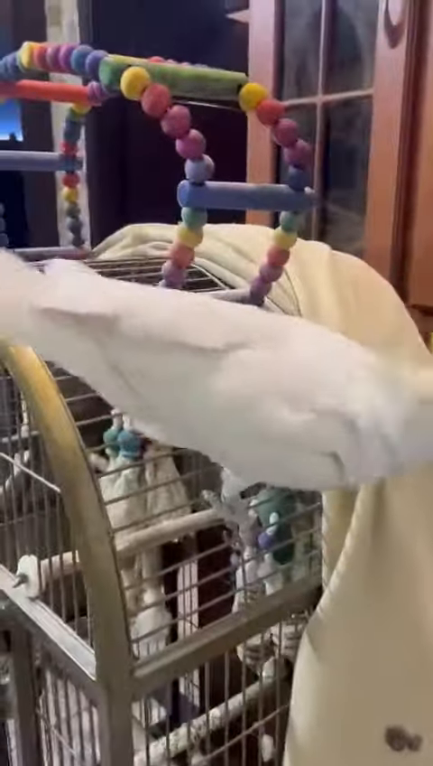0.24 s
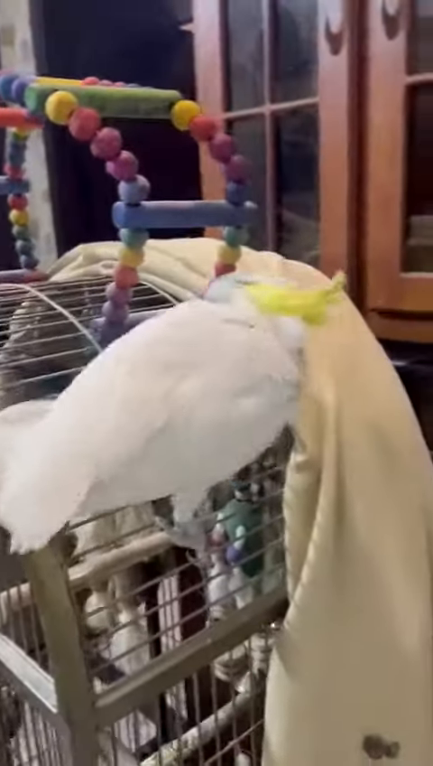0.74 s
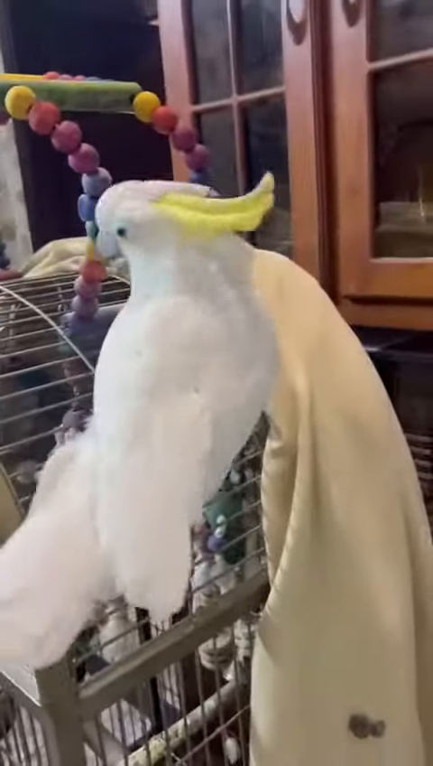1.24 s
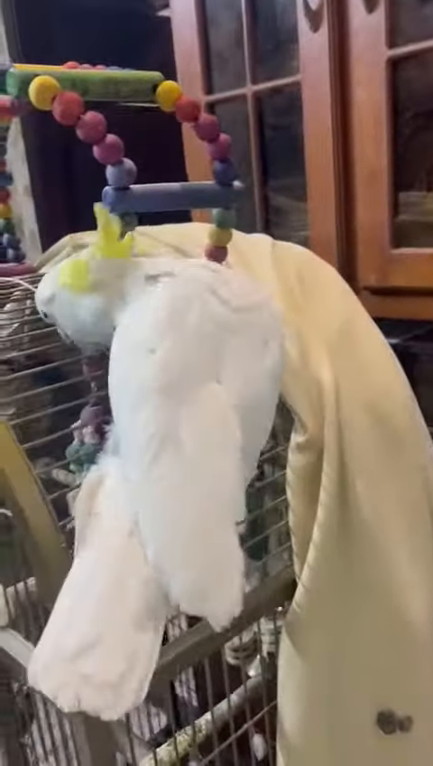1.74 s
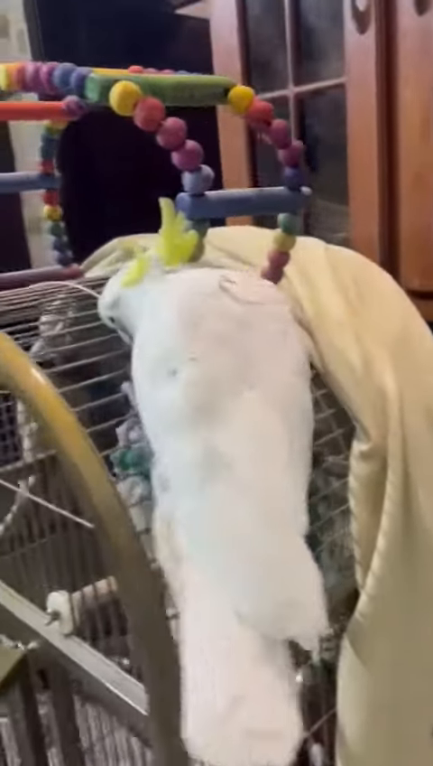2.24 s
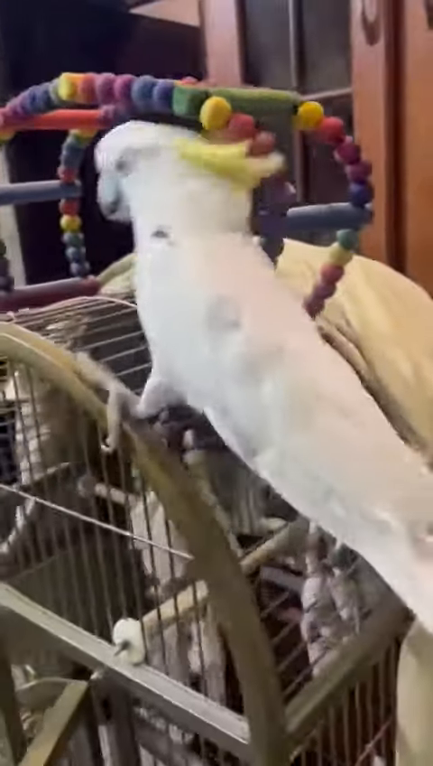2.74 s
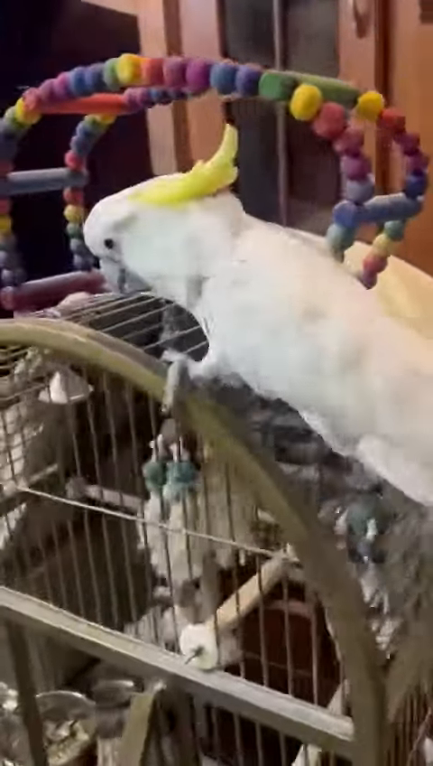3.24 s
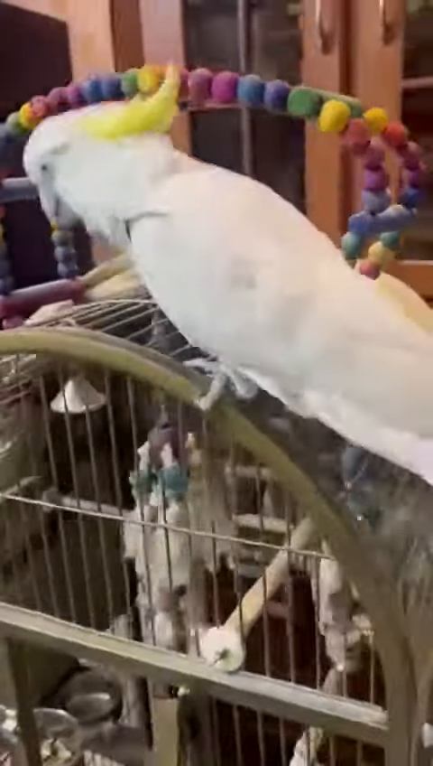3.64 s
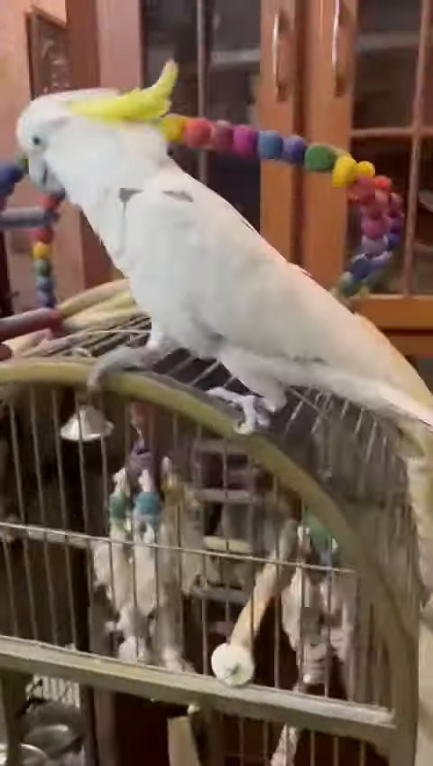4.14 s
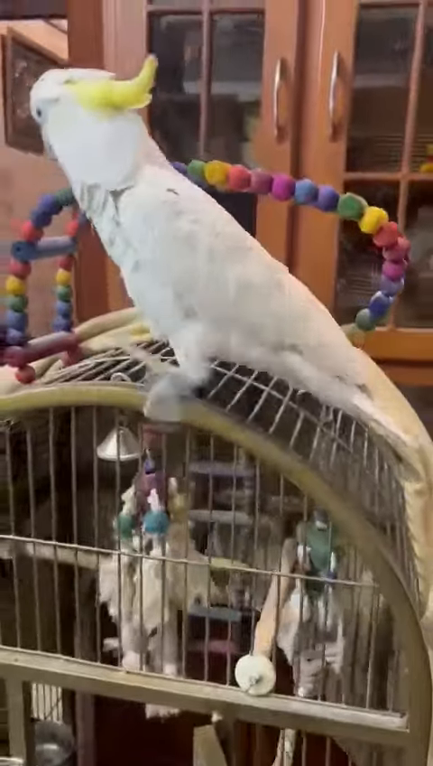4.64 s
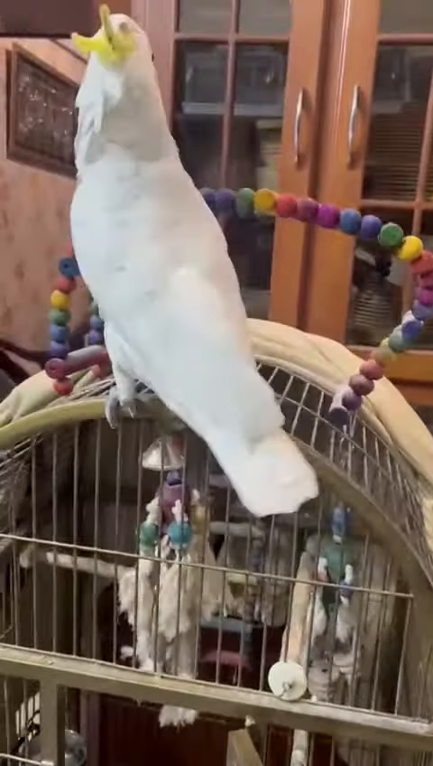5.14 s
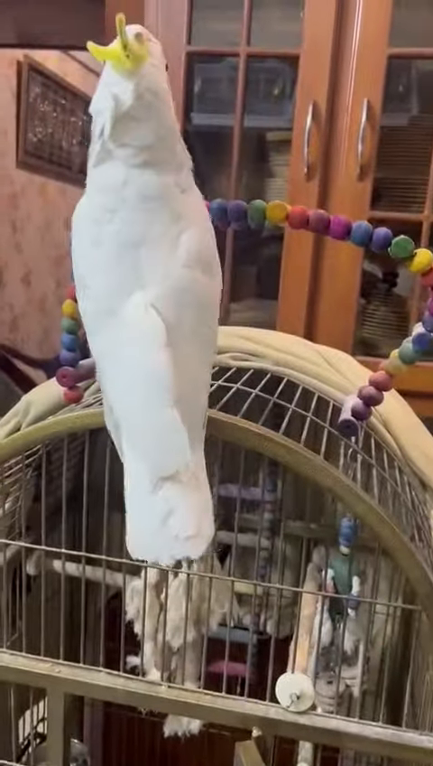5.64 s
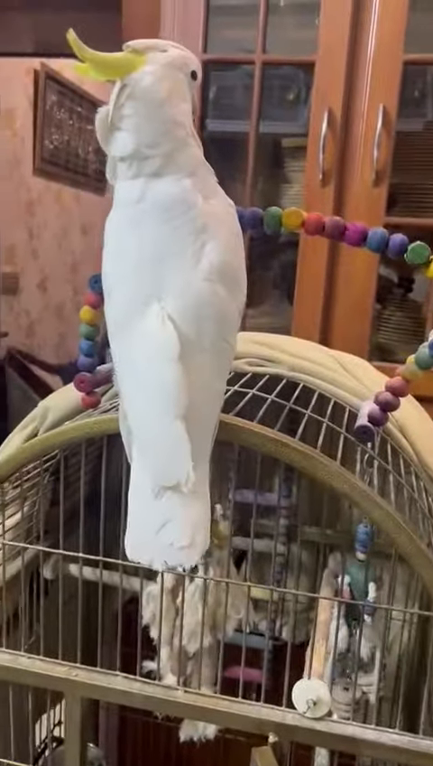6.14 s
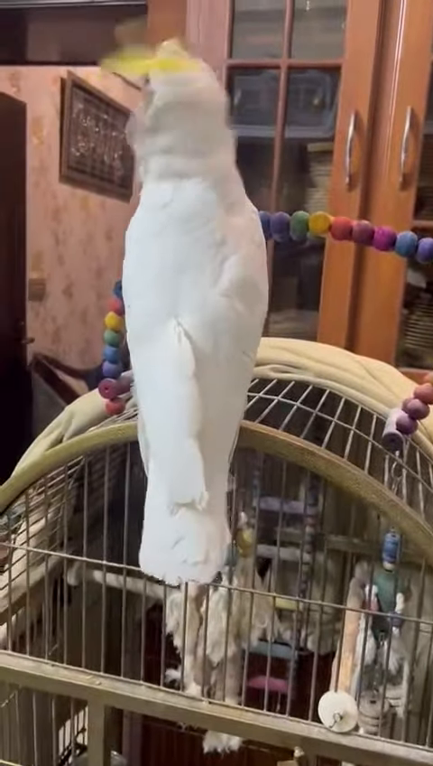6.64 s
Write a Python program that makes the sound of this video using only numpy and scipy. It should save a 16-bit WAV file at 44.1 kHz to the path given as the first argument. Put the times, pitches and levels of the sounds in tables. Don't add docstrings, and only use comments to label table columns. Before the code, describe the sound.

A pet cockatoo gives two small rising chirps, a short squawk, rattles its wire cage, then screams four harsh piercing squawks in a furnished room.

```python
import sys
import numpy as np
from scipy import signal
from scipy.io import wavfile
from scipy.ndimage import uniform_filter1d

SR = 44100
rng = np.random.default_rng(int(sys.argv[2]) if len(sys.argv) > 2 else 0)


def volts_from_db(level):
    exponent = np.asarray(level, float) / 20
    return 10 ** exponent


def store_wav(level_fs):
    pcm = np.round(np.clip(np.atleast_2d(level_fs), -1, 1) * 32767)
    wavfile.write(sys.argv[1], SR, pcm.T.astype(np.int16))


N = 303849


def rms_one(x):
    return x / np.sqrt(np.mean(x ** 2) + 1e-20)


def at_hz(points, hz):
    table = np.array(points)
    return np.interp(np.log(hz), np.log(table[:, 0]), table[:, 1])


def drift(rate_hz, size):
    r = np.exp(-2 * np.pi * rate_hz / SR)
    noise = rng.standard_normal(size + 4000)
    return rms_one(signal.lfilter([1], [1, -2 * r, r * r], noise)[4000:])


def ring(clicks, hz, t60):
    r, w = volts_from_db(-60 / (t60 * SR)), 2 * np.pi * hz / SR
    return signal.lfilter([0, np.sin(w)], [1, -2 * r * np.cos(w), r * r], clicks + 1e-18)


def bands():
    edges = 24 * 2 ** np.arange(0, 9.1, .5)
    return [(np.sqrt(a * b), signal.butter(2, [a, b], "band", fs=SR, output="sos"))
            for a, b in zip(edges, edges[1:])]


def add(out, s, part):
    i = round(s * SR)
    out[i:i + len(part)] += part[:len(out) - i]


# flutter_hz, flutter_depth (0-1), pitch_jitter (share), upper_partials_db,
# half_line_slope_db (per multiple of pitch)
EFFORT = [
    (60.1, 0.2, 0.0013, -6, -8),
    (75.6, 0.53, 0.0012, -2.5, -4.5),
    (61.3, 0.81, 0.0073, -4, -3),
    (106.3, 0.8, 0.0055, -4.5, 0.9),
    (110.3, 0.5, 0.00545, 0.5, 1.3),
    (104.6, 0.9, 0.0057, -4.5, 0.7),
    (97.3, 0.39, 0.0076, 2, 0.1),
    (80.8, 0.55, 0.003, 5, -6),
]
# pitch_multiple, over_partial_3_db
UPPER = [(4, -7), (5, -23.5)]
# pitch_multiple, over_half_lines_db
HALVES = [(.5, -21.5), (1.5, 2.5), (2.5, -1), (3.5, 1), (4.5, -2.5), (5.5, -5.5)]


def voice():
    out, t = np.zeros(N), np.arange(SR // 4) / SR
    calls = [chirp(t, *c) for c in zip(CHIRPS, CHIRP_BEND)]
    calls += [squawk(t, *c) for c in zip(SQUAWKS, SQUAWK_TONE, SQUAWK_BREATH)]
    for call, (flutter_hz, depth, jitter, upper_db, slope_db) in zip(calls, EFFORT):
        s, length, pitch, first, second, third, half = call
        flutter = np.cos(np.cumsum(2 * np.pi * flutter_hz * (1 + 0.15 * drift(12, len(t))) / SR))
        unrest = 1 + depth * np.abs(np.gradient(pitch)) * SR / 4000
        waver = jitter * unrest * drift(120, len(t)) + .022 * depth * flutter
        phase = np.cumsum(2 * np.pi * pitch * (1 + waver) / SR)

        lines = [(1, first), (2, second), (3, third)]
        lines += [(k, third + db + upper_db) for k, db in UPPER]
        lines += [(k, half + db + slope_db * (k - 1.5)) for k, db in HALVES]
        sound = 0
        for k, db in lines:
            wander_db = (.8 + 2.5 * depth) * min(1.5, k / 3) * drift(35, len(t))
            sound = sound + volts_from_db(db + wander_db) * np.sin(k * phase)
        sound = sound * (1 + .35 * np.clip(depth, 0, 1) * flutter)

        air = throat(rng.standard_normal(len(t)) * (1 + np.cos(phase)))
        rasp = signal.sosfilt(signal.butter(4, 3300, "high", fs=SR, output="sos"), air)
        sound = sound + volts_from_db(second - 27) * rms_one(air) + volts_from_db(half - 8 + slope_db) * rms_one(rasp)
        fade = np.clip(np.minimum(t, length - t) / .005, 0, 1)
        add(out, s, sound * fade)
    return out


# start_s, length_s, from_hz, to_hz, level_db
CHIRPS = [
    (0.386, 0.092, 1863, 2370, -33.5),
    (0.622, .097, 1671, 2410, -26.5),
]
CHIRP_BEND = [2.2, 1.15]
# start_over_level_db, gain_to_break_db
CHIRP_PARTIALS = [(-24, 12), (-43, 27.5)]


def chirp(t, row, bend):
    dip_db, break_at, mute_db, half_db = -4, 0.72, -36, -21
    s, length, from_hz, to_hz, level_db = row
    part = np.clip(t / length, 0, 1)
    broken = np.clip((part - break_at) / (1 - break_at), 0, 1)
    first = level_db + dip_db * np.sin(np.pi * part)
    second, third = [level_db + db + gain_db * part + (mute_db - gain_db) * broken
                     for db, gain_db in CHIRP_PARTIALS]
    half = level_db + half_db - 40 * np.clip(1 - 2 * broken, 0, 1)
    pitch = from_hz + (to_hz - from_hz) * part ** bend
    return s, length, pitch, first, second, third, half


# start_s, length_s, pitch_hz, sag_hz_per_s, level_db
SQUAWKS = [
    (1.481, 0.24, 2064, 702.5, -24.5),
    (3.83, 0.23, 2174, 201.5, -11),
    (4.164, 0.2, 2176, 400, -10.5),
    (4.532, 0.19, 2108, 279.5, -14),
    (4.995, 0.18, 2060, -9, -18),
    (6.704, 0.18, 1940, -200, -40),
]
# scoop_hz (from below), attack_s, then over level partial_1_db, partial_3_db, half_lines_db
SQUAWK_TONE = [(401, .03, -4.5, -10, -41.5), (114, 0.009, -5.5, -3.5, -18),
               (-42.5, 0.022, -14.5, -8.5, -16.5), (161, .018, -11, -2.5, -16),
               (113, .014, -13.5, -3.5, -13.5), (339.5, 0.059, -7, -19, -52)]
# start_db (over level), fade_db_per_s, scoop_bend (under 1 jumps late, over 1 early)
SQUAWK_BREATH = [(-16, -6.5, .6), (-3.5, 33.5, 1.3), (-5.5, 23, 0.97), (-8.5, 11.5, 0.98),
                 (0.5, 12.5, 1.03), (-14.5, -115, 2.2)]
FADE_DB_PER_S = [34, 51, 11.5, 1.5]
RELEASE_DB = [-9.5, -1.5, -8.5, -21.5]


def squawk(t, row, tone, breath):
    release_s, release_drop_hz, doubling_s, doubling_rise_s = 0.027, 162.8, .034, .006
    s, length, hz, sag, level_db = row
    scoop, attack, first_db, third_db, half_db = tone
    start_db, fade, bend = breath
    opening = np.clip(1 - t / attack, 0, 1)
    closing = np.clip(1 - (length - t) / release_s, 0, 1)
    pitch = hz - scoop * opening ** bend - sag * t - release_drop_hz * closing
    level = level_db + start_db * opening ** .4 - fade * t
    late = -40 / (1 + np.exp((t - doubling_s) / doubling_rise_s))
    partials_db = (first_db, 0, third_db, half_db + late)
    lines = [level + db - more * t + last_db * closing
             for db, more, last_db in zip(partials_db, FADE_DB_PER_S, RELEASE_DB)]
    return s, length, pitch, *lines


# centre_hz, width_hz, level_db
THROAT = [(900, 200, -28), (1700, 1100, -2.5), (2705, 1100, 1), (4010, 280, 5), (6220, 540, 3.5),
          (8330, 290, -1.5), (9600, 600, -3.5)]


def throat(x):
    out = 0
    for k, (hz, width, db) in enumerate(THROAT):
        out = out + (-1) ** k * volts_from_db(db) * np.sqrt(width) * ring(x, hz, 1.8 / width)
    return out


# start_s, count, gap_s
CREAKS = [
    (3.778, 5, .0122),
    (4.143, 3, .0097),
    (4.505, 4, .0102),
    (4.952, 5, .0115),
]
CREAK_FULL_DB = [-14.5, -17, -16.5, -24.5]


def creaks():
    start_db, growth = -16.5, 0.19
    out, t = np.zeros(N), np.arange(600) / SR
    for (s, count, gap), full_db in zip(CREAKS, CREAK_FULL_DB):
        for k in range(count):
            puff = throat(rng.standard_normal(len(t)) * t * np.exp(-t / .002))
            level = volts_from_db(full_db + 6 + start_db * growth ** k)
            add(out, s + k * gap, level * puff / np.abs(puff).max())
    return out


def snap():
    out, t = np.zeros(N), np.arange(600) / SR
    phase = 2 * np.pi * 750 * (t + 3.07 * 0.00034 * (1 - np.exp(-t / 0.00014)))
    add(out, 1.0765, volts_from_db(-23.5) * np.sin(phase) * np.exp(-t / 0.0013))
    return out


def cage():
    modes = np.geomspace(500, 12000, 300) * (1 + .01 * rng.standard_normal(300))
    return knocks(modes) + scuffs(modes) + rings()


# start_s, peak_db, thick_bars_db, loudest_bar_hz, rattle_s
KNOCKS = [(1.789, -23.5, -24, 6470, 0.015), (1.895, -29, -16.5, 9400, 0.014),
          (2.008, -33, -25, 7660, 0.021), (2.135, -14.5, -22, 6540, 0.024),
          (2.159, -22.5, -14.5, 6860, 0.036), (2.269, -20.5, -5.5, 8600, 0.0062),
          (2.499, -44, -27, 7320, 0.0087), (2.527, -28.5, -20.5, 4670, 0.036),
          (2.58, -30.5, -1.5, 4300, 0.0084), (2.671, -15.5, -24.5, 8510, 0.009),
          (2.965, -42, -31, 8050, 0.012), (3.15, -38.5, -13, 8400, 0.035),
          (3.218, -32, -12.5, 8950, 0.0057), (3.417, -37.5, -26.5, 9080, 0.032),
          (3.463, -34, -16, 9200, 0.0098), (3.568, -29, -10, 7910, 0.014), (5.489, -66.5, 11, 4960, 0.01),
          (5.724, -56, -3.5, 7860, 0.017), (5.804, -72, 18.5, 4590, 0.0099),
          (5.899, -57.5, -3, 7960, 0.0087), (6.109, -54.5, -33, 5670, 0.012), (6.166, -68, 10, 5060, 0.011)]
BAR_ZONES_HZ = [1100, 3435, 8600]


def knocks(modes):
    out, t = np.zeros(N), np.arange(SR // 2) / SR
    for s, peak_db, weight_db, hz, rattle in KNOCKS:
        hits = rng.random(len(t)) < 4000 / SR
        clicks = hits * rng.standard_normal(len(t)) * np.exp(-t / max(rattle, .001)) * 0.91
        clicks[0] = .45
        zones_db = [weight_db - 16.5, weight_db, -4]
        colour = np.interp(np.log(modes), np.log(BAR_ZONES_HZ), zones_db)
        colour = colour + 9 * np.exp(-(np.log(modes / hz) / .07) ** 2)
        add(out, s, volts_from_db(peak_db - 4.5) * bars(clicks, colour, modes))
    return out


# start_s, level_db, centre_hz, spread_octaves, swell_s
SCUFFS = [
    (0, -57, 4500, 1.5, 0.0086),
    (0.161, -54.5, 2300, 1.26, 0.093),
    (0.244, -42.5, 1576, 1.18, 0.026),
    (1.078, -56.5, 8000, 0.91, 0.019),
    (1.159, -53, 3060, 0.7, 0.07),
    (1.637, -42, 2500, 1.06, 0.027),
    (1.989, -51, 7900, 2.8, 0.013),
    (3.189, -43, 7400, 2.2, 0.028),
    (3.595, -37.5, 3760, .5, 0.05),
    (6.58, -65, 7000, 1.03, 0.076),
]


def scuffs(modes):
    out, t = np.zeros(N), np.arange(SR // 2) / SR
    for s, level_db, hz, spread, swell in SCUFFS:
        hits = rng.random(len(t)) < 3500 * volts_from_db(4 * drift(30, len(t))) / SR
        clicks = hits * rng.standard_normal(len(t))
        clicks = clicks * t / swell * np.exp(1 - t / swell)
        colour = -6 * (np.log2(modes / hz) / spread) ** 2
        add(out, s, volts_from_db(level_db - 6.0) * bars(clicks, colour, modes))
    return out


# start_s, pitch_hz, level_db, t60_s
RINGS = [(5.73, 4463, -80, 1.5), (5.9, 4463, -69, 1.0), (5.9, 8861, -80, 1.0), (5.78, 1647, -72, 2.5),
         (3.12, 2350, -59, .3), (3.22, 2350, -56, .2), (3.598, 3750, -46, .12), (3.66, 4450, -52, .3),
         (6.17, 5050, -66, .1), (4.345, 265, -41, .3), (5.47, 250, -58, .2)]


def rings():
    out, t = np.zeros(N), np.arange(SR // 2) / SR
    fade = np.clip(t / 0.0013, 0, 1) * np.clip((.5 - t) / .1, 0, 1)
    for s, hz, level_db, t60 in RINGS:
        add(out, s, volts_from_db(level_db - 60 * t / t60) * np.sin(2 * np.pi * hz * t) * fade)
    return out


# mode_hz, t60_s
BAR_T60 = [(600, .04), (3000, .035), (11000, .03)]


def bars(clicks, colour, modes):
    t = np.arange(SR // 10) / SR
    strength = volts_from_db(colour + rng.normal(0, 3, len(modes))) * rng.choice([-1, 1], len(modes))
    strength = strength / (1 + (modes / 10800) ** 8)
    decay = volts_from_db(-60 * t / at_hz(BAR_T60, modes)[:, None])
    body = strength @ (decay * np.sin(2 * np.pi * modes[:, None] * t))
    return signal.fftconvolve(clicks, body / np.sqrt(len(modes)))


# band_hz, t60_s
ROOM_T60 = [(500, .6), (1300, .55), (3500, .43), (9000, .38)]


def room(x):
    tail_db, early_db, alike = -5, -9, .4
    t = np.arange(SR) / SR
    noise = rng.standard_normal((2, SR))
    tail = sum(signal.sosfilt(sos, noise) * volts_from_db(-60 * t / at_hz(ROOM_T60, hz)) for hz, sos in bands()[6:])
    tail = tail * np.clip(t / .015, 0, 1)
    tail = volts_from_db(tail_db) * tail / np.sqrt(np.sum(tail[0] ** 2))
    echoes = (rng.uniform(0.0018, .025, 8) * SR).astype(int)
    tail[:, echoes] += volts_from_db(early_db) * rng.normal(0, .45, (2, 8))
    ears = np.sqrt(1 + alike) * tail[0] + np.sqrt(1 - alike) * tail[1] * [[1], [-1]]
    return signal.fftconvolve(x[None], ears, axes=1)[:, :N]


# time_s, recorder_gain_db, stir_db (feathers and wires)
HOUSE = [(0, 0.1, -2.5), (.7, -2, 5.5), (1.2, -4, -3), (1.7, 0.4, 6), (2.3, 0.6, 13), (3.1, 1.5, 5.5),
         (3.43, 0.7, 7.5), (3.699, 1.5, 4), (3.9, -1.5, -7.5), (4.3, -7, -5.5), (4.9, -7, 6),
         (5.399, -6.5, -9), (6.0, -7.5, -2.7), (6.4, -6, -2.3), (6.89, -12, 6)]
HOUSE_ZONES_HZ = [85, 160, 400, 3000]
FOLLOWS_GAIN = [1.3, 1.3, 1.1, 0.61]
# band_hz, density_db (per Hz)
AIR = [(15, -39), (25, -17), (110, -2.5), (290, -8.5), (529, -16), (2280, -29), (9130, -38.5),
       (11500, -78.5)]
# band_hz, likeness
LIKENESS = [(60, 1), (290, 0.97), (490, 0.4), (1420, 0.079), (4060, 0.93), (11700, 0.42)]


def house():
    s, gain_db, stir_db = np.transpose(HOUSE)
    out, white = 0, rng.standard_normal((2, 2, N))
    for k, (hz, sos) in enumerate(bands()):
        mid, side = signal.sosfilt(sos, white[k % 2])
        alike = np.clip(at_hz(LIKENESS, hz), -1, 1)
        follows = np.interp(np.log(hz), np.log(HOUSE_ZONES_HZ), FOLLOWS_GAIN)
        stirred = np.interp(np.log(hz), np.log(HOUSE_ZONES_HZ), [0, 0, 0, 1])
        change = np.interp(np.arange(N) / SR, s, follows * gain_db + stirred * stir_db)
        gain = volts_from_db(at_hz(AIR, hz) - 32 + change + 1.5 * drift(4, N))
        out = out + gain * (np.sqrt(1 + alike) * mid + np.sqrt(1 - alike) * side * [[1], [-1]])
    return out


# centre_hz, width_hz, over_db
HUMS = [(96, 12, -2.5), (156, 16, 0)]
# time_s, level_db
HUM = [(0, -64.5), (2.1, -66.5), (2.4, -59.5), (3.8, -62), (4.3, -61), (4.55, -52), (4.8, -62.5),
       (5.6, -65), (5.75, -53.5), (6.7, -58.5), (6.89, -49)]


def drones():
    s, gain_db, _ = np.transpose(HOUSE)
    t, out = np.arange(N) / SR, 0
    rumble_db = -52 + FOLLOWS_GAIN[0] * np.interp(t, s, gain_db)
    hum_db = np.interp(t, *np.transpose(HUM))
    for (hz, width, over_db), level in zip(HUMS, (rumble_db, hum_db)):
        out = out + volts_from_db(level + over_db) * rms_one(ring(rng.standard_normal(N), hz, 2.2 / width))
    return out


# time_s, left_over_right_db
TURN = [(0, 1.2), (.8, 1.8), (1.4, -1.5), (1.8, -0.5), (2.0, -0.1), (3.8, 0.9), (4.2, -0.9), (4.6, 0.3),
        (6.55, 1.3), (6.72, 3.5)]


def scene():
    bird = voice() + creaks() + cage()
    close = snap()
    turn = volts_from_db(np.interp(np.arange(N) / SR, *np.transpose(TURN)) * [[.5], [-.5]])
    direct = np.array([np.roll(bird, 1), bird])
    return turn * (direct + room(bird + volts_from_db(-3) * close)) + close + house() + drones()


# band_hz, level_db
QUIET = [(7000, -114), (9000, -103), (11500, -88)]


def thin_bands(x):
    mask_db, fall_db = -6, 7
    hz, s, z = signal.stft(x, SR, nperseg=2048)
    steps = np.arange(85)[:, None]
    power = np.mean(np.abs(z[:, :1020]) ** 2, axis=0)
    band = 10 * np.log10(power.reshape(85, 12, -1).mean(axis=1) + 1e-20)
    shadow = np.maximum.accumulate(band + fall_db * steps, axis=0) - fall_db * steps
    centre = hz[6:1020:12, None]
    whim = uniform_filter1d(rng.normal(0, 5, band.shape), 4, axis=1)
    unmasked = band > shadow + mask_db + whim
    audible = band > at_hz(QUIET, centre) + 2 * whim
    keep = unmasked & audible | (centre < 2450)
    z[:, :1020] *= keep.repeat(12, axis=0)
    return signal.istft(z, SR, nperseg=2048)[1][:, :N]


def band_limit(x):
    return signal.sosfilt(signal.butter(12, 12260, fs=SR, output="sos"), x)


def record(dry):
    cut = signal.sosfilt(signal.cheby2(12, 70, 12400, fs=SR, output="sos"), np.tanh(dry))
    cut = signal.sosfilt(signal.butter(2, 32, "high", fs=SR, output="sos"), cut)
    return band_limit(thin_bands(cut))


dry = scene()
out = record(dry)
store_wav(out)
```